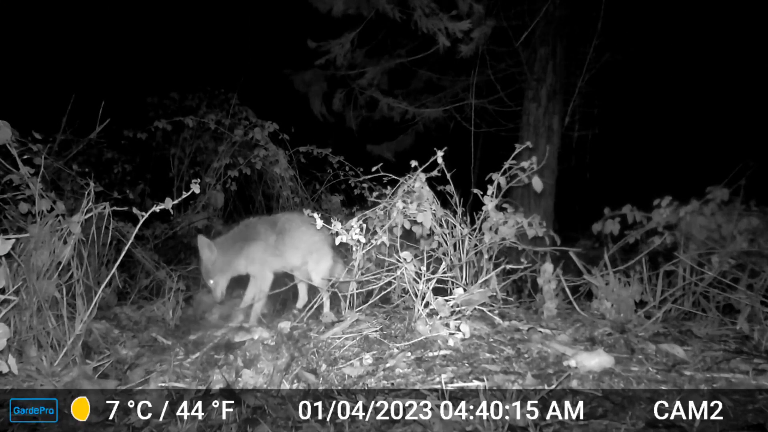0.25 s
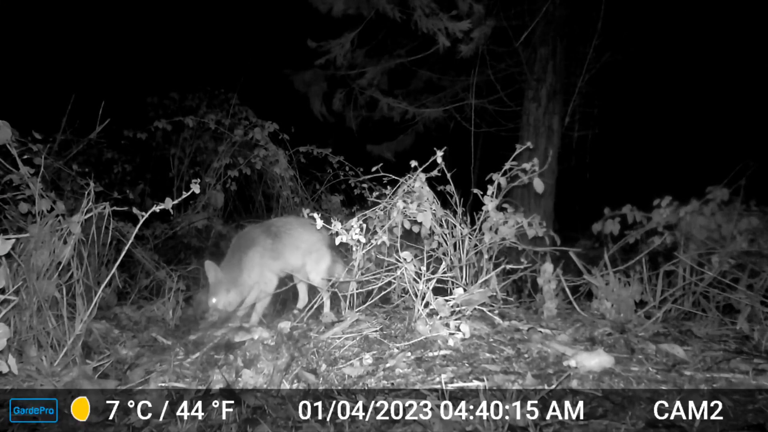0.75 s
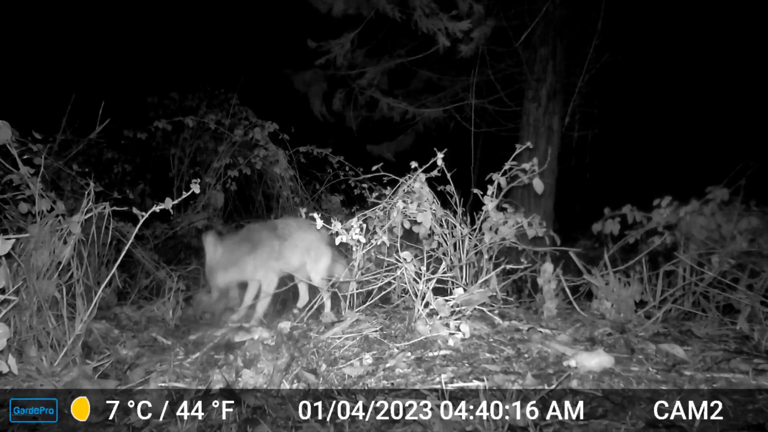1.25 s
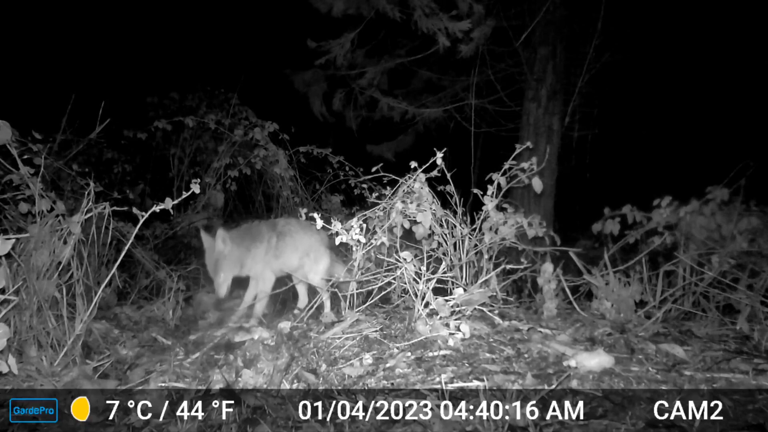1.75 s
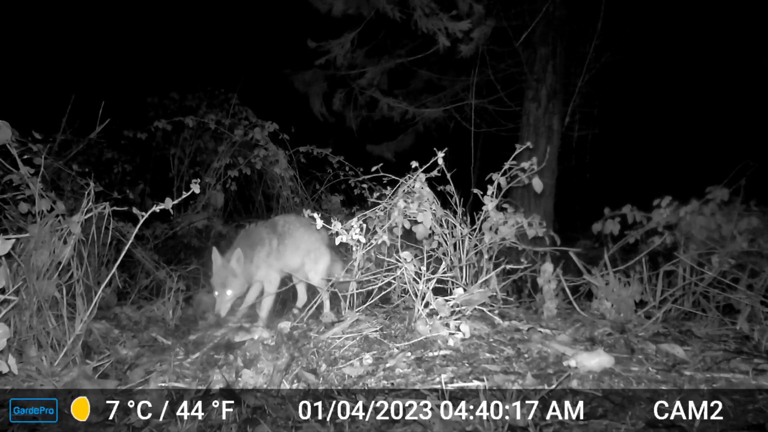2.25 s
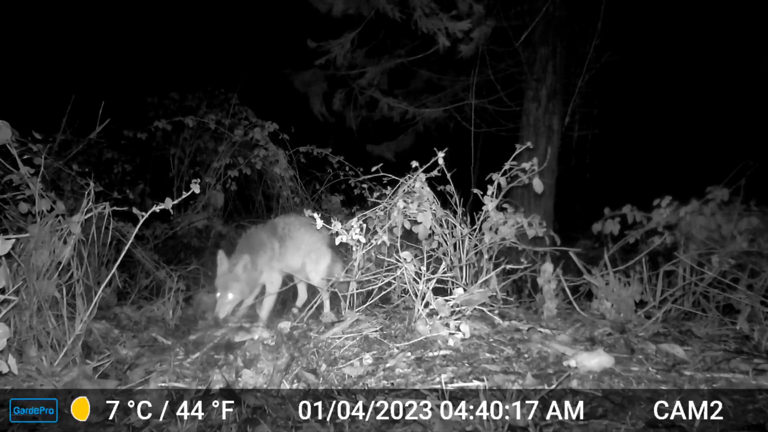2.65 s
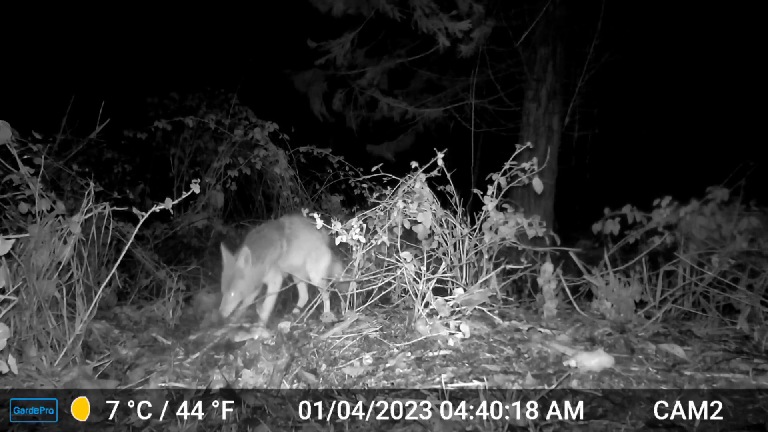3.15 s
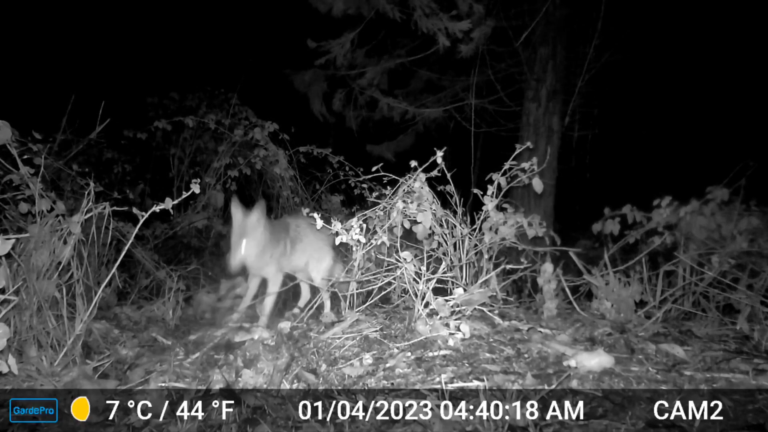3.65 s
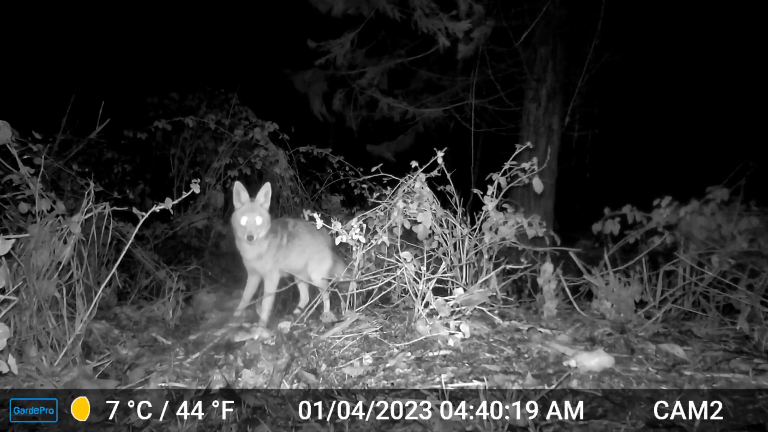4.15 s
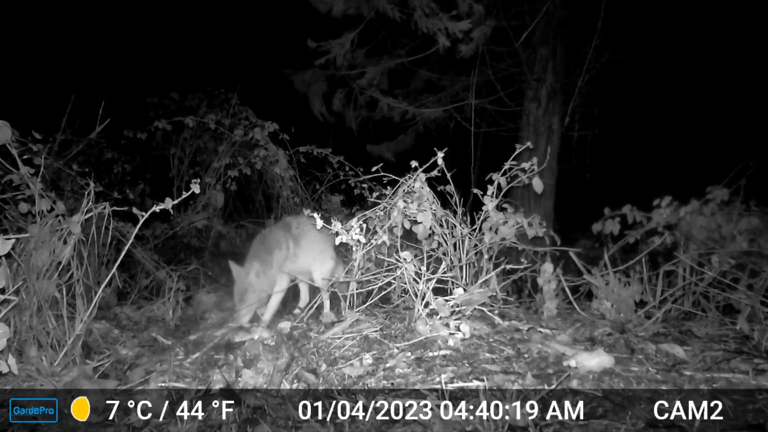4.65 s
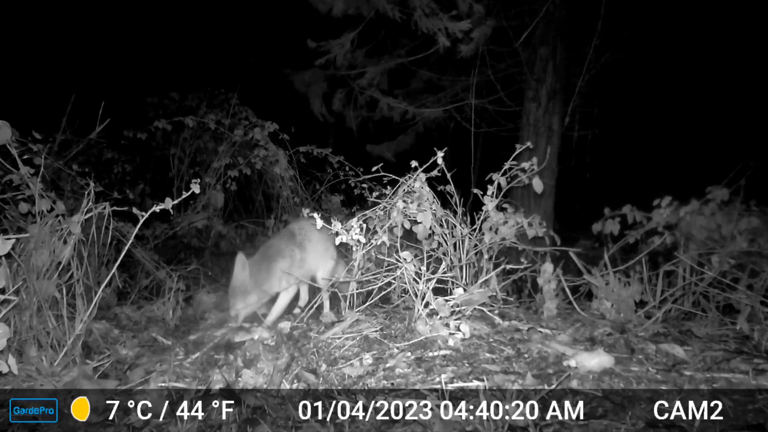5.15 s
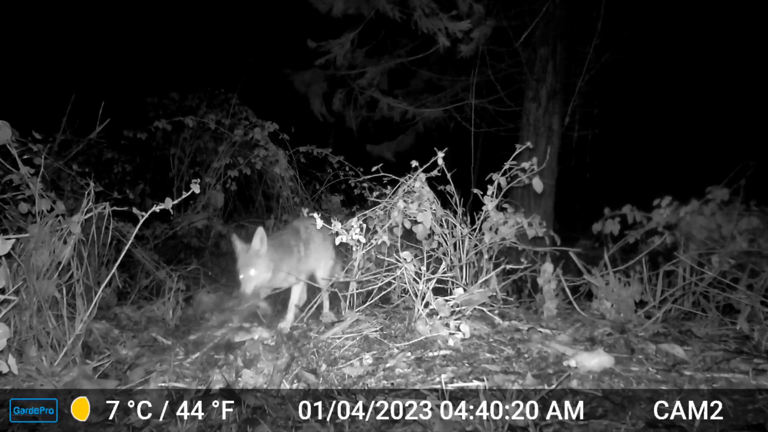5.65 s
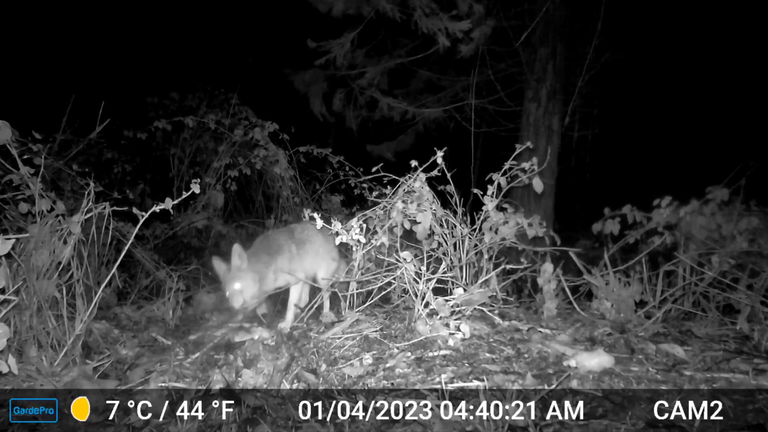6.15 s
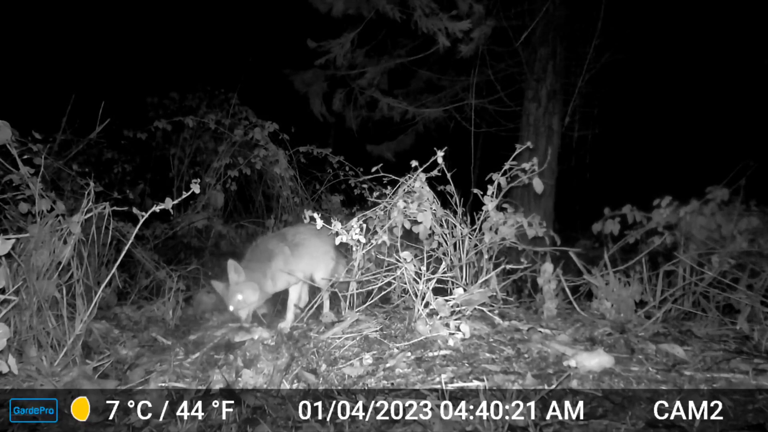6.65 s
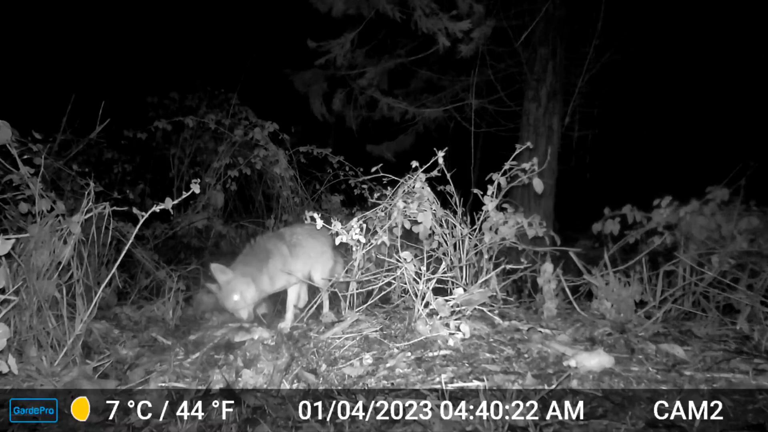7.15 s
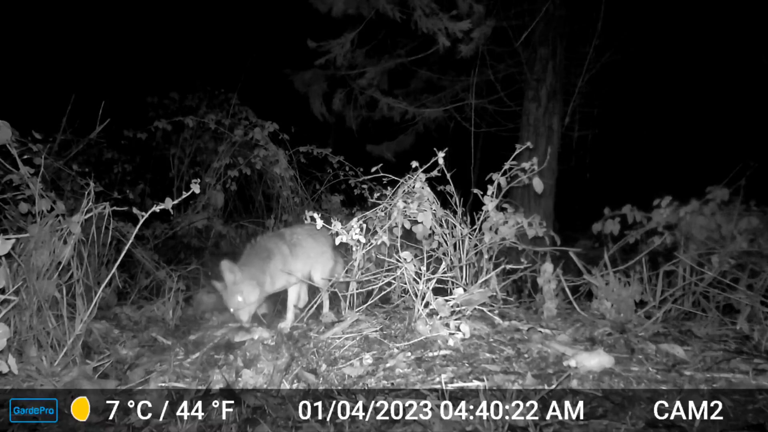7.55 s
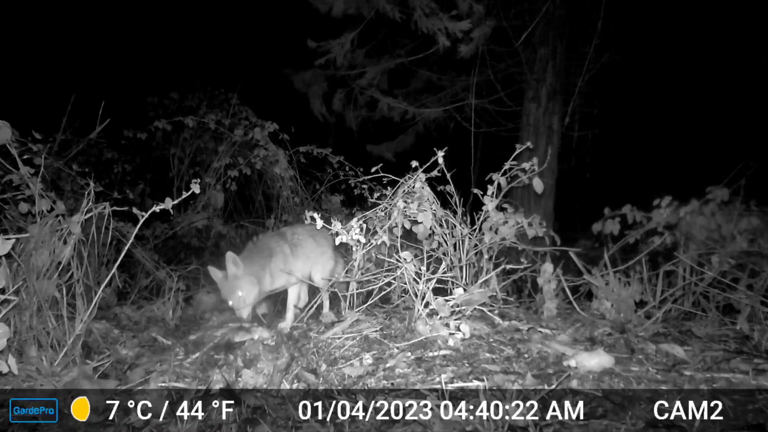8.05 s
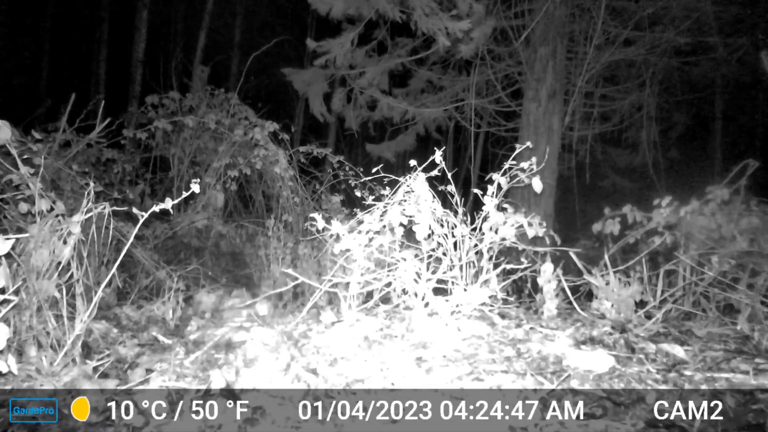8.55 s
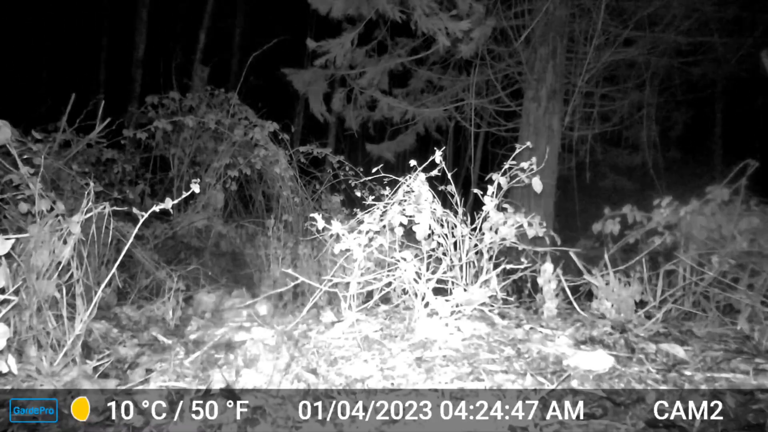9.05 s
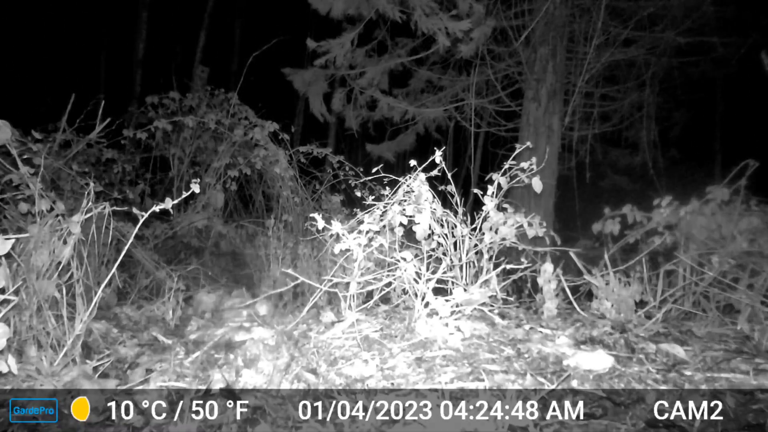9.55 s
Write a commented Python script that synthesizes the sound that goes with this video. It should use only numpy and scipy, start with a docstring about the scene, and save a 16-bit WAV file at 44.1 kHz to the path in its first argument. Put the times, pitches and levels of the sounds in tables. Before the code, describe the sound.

Dull, close outdoor sound without bright treble: a fox gnaws bones on leaf litter, making tiny dry snaps, crunchy rustles and muffled low bumps in uneven bursts. One hollow bone crack stands out early, and a short scraping drag through leaves comes late. Then a sudden cut, a silent gap, and an empty windy place fading up in quick steps, gusts softly knocking the microphone.

```python
"""Night, dry leaves: a fox chews bones a few metres from a small, nearly mono camera microphone.
From the start a low rumble, hiss and crackling leaves flutter under an expander, with teeth clicks as
ringing sprays of noise and dull thuds as low swings. A dull tone wavers at 1.75 s, a bone cracks at 2.9 s
as a noise snap with decaying sines, and at 7.25 s something drags through the leaves. After a silent gap
the gain climbs in steps on an empty, windy scene of shaped noise, where late gusts knock on the microphone."""
import sys
import numpy as np
from scipy import signal
from scipy.fft import rfft, irfft, next_fast_len
from scipy.io import wavfile
from scipy.ndimage import uniform_filter1d

SR = 44100
rng = np.random.default_rng(int(sys.argv[2]) if len(sys.argv) > 2 else 0)


def bounce(signal):
    """Save signal as a 16-bit WAV file at the path given by the first command-line argument."""
    frames = np.transpose(np.atleast_2d(signal))
    limited = np.clip(frames, -1, 1)
    pcm = np.round(limited * 32767).astype(np.int16)
    wavfile.write(sys.argv[1], SR, pcm)


def ratio_of_db(decibels):
    """Turn decibels (scalar or array-like) into linear amplitude factors; 0 dB maps to 1."""
    return 10 ** (np.asarray(decibels, float) / 20)


N = 432621
CUT_S, RESTART_S, FULL_S = 8.229, 8.607, 9.292  # feeding ends, empty scene starts, its gain is full


def in_time(rows):
    """Columns of a curve table, one value per sample."""
    s, *columns = np.transpose(rows)
    return [np.interp(np.arange(N) / SR, s, column) for column in columns]


def rms_one(x):
    """Scale to rms 1."""
    return x / np.sqrt(np.mean(x ** 2) + 1e-20)


def peak_one(x):
    """Scale to peak 1."""
    return x / np.max(np.abs(x))


def colour(x, spectrum):
    """Shape a white signal by (f/Hz, level/dB) points joined over log frequency; rms 1."""
    size = next_fast_len(N)
    hz = np.maximum(np.arange(size // 2 + 1) * SR / size, 1)
    point_hz, point_db = np.transpose(spectrum)
    gain = ratio_of_db(np.interp(np.log(hz), np.log(point_hz), point_db))
    return rms_one(irfft(rfft(x, size) * gain, size)[:N])


def band(x, low_hz, high_hz):
    """Causal band-pass; the upper edge is held to a third of the sample rate."""
    edges = [low_hz, min(high_hz, SR / 3)]
    return signal.sosfilt(signal.butter(2, edges, "band", fs=SR, output="sos"), x)


def add(out, s, sound):
    """Lay a short sound in at time s."""
    i = max(round(s * SR), 0)
    out[i:i + len(sound)] += sound[:N - i]


def lumps(per_s):
    """Slow random wander, rms 1: noise through a double low-pass pole at per_s Hz."""
    r = np.exp(-2 * np.pi * per_s / SR)
    return rms_one(signal.lfilter([1], [1, -2 * r, r * r], rng.standard_normal(N + SR))[SR:])


def grains(per_s, spread_db):
    """Random tiny snaps of uneven size and either sign."""
    sizes = ratio_of_db(spread_db * np.minimum(rng.exponential(1, N), 3.5)) * rng.choice([-1, 1], N)
    return sizes * (rng.random(N) < per_s / SR)


# rumble and leaves while feeding, before the random stir: t/s, rumble level/dB, leaves level/dB
FEEDING = [(0.15, -55, -64.5), (0.55, -59.5, -64.5), (1.05, -57, -67), (1.35, -58.5, -63),
           (1.65, -58.5, -66), (1.9, -52, -65), (2.55, -60, -65), (3.05, -54.5, -63.5), (3.45, -54, -68),
           (3.9, -58, -63), (4.35, -58.5, -72), (4.85, -56, -68), (5.3, -55.5, -62.5), (5.7, -55.5, -59),
           (6.08, -59.5, -62), (6.3, -58, -59), (6.6, -61, -64), (6.87, -54.5, -61.5), (7.05, -60, -62.5),
           (7.25, -57.5, -63), (7.5, -57.5, -64), (7.7, -60, -61), (7.87, -64, -64.5), (8.0, -55, -63.5),
           (8.17, -54.5, -57)]
# spectrum of the rumble: f/Hz, relative level/dB per Hz
RUMBLE_COLOUR = [(12, -50.5), (20, -12.5), (52, -2), (75, 3), (241, -7), (664, -23), (1000, -32),
                 (1300, -43.5), (2200, -120)]


def rumble():
    """Lumpy low noise, stirred more when the leaves are busier; returns it and its stir in dB."""
    rumble_db, leaves_db = in_time(FEEDING)
    stir_db = np.clip(0.41 * (leaves_db + 72.0), 1, 4.5) * lumps(42)
    return ratio_of_db(rumble_db + stir_db) * colour(rng.standard_normal(N), RUMBLE_COLOUR), stir_db


# hiss under the feeding: t/s, level/dB
NEAR_HISS = [(0, -64), (2, -64.5), (2.7, -65), (4.2, -63), (5.6, -63), (6.5, -65), (8.2, -65.5)]
# spectrum of that hiss: f/Hz, relative level/dB per Hz
HISS_COLOUR = [(290, -30), (500, -8.5), (1270, -6.5), (1370, -5.5), (7900, -8), (10300, -42)]


def near_hiss():
    """Steady microphone hiss: shaped noise whose level drifts slightly."""
    return ratio_of_db(in_time(NEAR_HISS)[0]) * colour(rng.standard_normal(N), HISS_COLOUR)


def crackle(per_s=800, spread_db=4.0, cycles=36.0, clumpy_db=5, dry=0.45):
    """Clumped small scrapes: a few ms of noise ring at one of 20 pitches within a dry puff; rms 1."""
    snaps = grains(per_s * ratio_of_db(clumpy_db * lumps(14)), spread_db)
    dealt = rng.integers(0, 20, N)  # which pitch each snap excites
    noise, ringing = rng.standard_normal(N), 0
    for k, hz in enumerate(np.geomspace(500, 7200, 20)):
        r = ratio_of_db(-60 * hz / (cycles * SR))  # falls 60 dB in the given number of cycles
        w = 2 * np.pi * hz / SR
        scrape = noise * uniform_filter1d(np.abs(snaps) * (dealt == k), size=240) + 1e-18
        ring = signal.lfilter([1 - r * r, 0, r * r - 1], [1, -2 * r * np.cos(w), r * r], scrape)
        ringing = ringing + ring / (1 - r) ** 0.81  # lower pitches are stronger
    puff_size = np.sqrt(np.abs(uniform_filter1d(snaps ** 2, size=200)))
    puffs = puff_size * band(rng.standard_normal(N), 320, 6300)
    return rms_one(rms_one(ringing) + dry * rms_one(puffs))


def leaves(low, stir_db, follows=0.54, quiet_db=-56):
    """Crackling leaves that crunch with every low movement, here the short-time power of low."""
    leaves_db = in_time(FEEDING)[1]
    low_power = np.abs(uniform_filter1d(low ** 2, size=500))
    pressed_db = follows * 10 * np.log10(low_power + ratio_of_db(2 * quiet_db))
    return ratio_of_db(leaves_db + 0.5 * stir_db + pressed_db - pressed_db.mean()) * crackle()


# teeth and twigs: t/s, nominal peak level/dB before the expander, ring f/Hz, length/ms, ringing share 0-1
CLICKS = [(0.132, -52, 1110, 4.4, 1), (0.159, -56.5, 1380, 10, 1), (0.198, -51.5, 1400, 8, 0.3),
          (0.2098, -41, 1140, 4.1, 0.72), (0.233, -44, 450, 7.5, 0.8), (0.273, -48, 1250, 5.3, 0.6),
          (0.3866, -33, 2700, 1.3, 0.4), (0.806, -46.5, 1250, 12, 0.97), (0.9774, -47.5, 5640, 3.1, 1),
          (1.073, -51.5, 1114, 39, 0.92), (1.251, -50, 1430, 3, .7), (1.2786, -34.5, 3800, 1.7, 0.66),
          (1.285, -41.5, 6300, 10, 0.56), (1.3154, -42.5, 5600, 2, 0.8), (1.8483, -46.5, 1210, 5.2, 0.64),
          (1.909, -46.5, 916, 2.7, 0.7), (2.044, -50, 1200, 8, .4), (2.25, -48, 1110, 4, 0.8),
          (2.4272, -43.5, 3530, 3, 0.3), (2.463, -28, 1167, 2.2, 0.27), (2.4688, -33.5, 950, 4.5, 0.37),
          (2.702, -32.5, 700, 4.8, 0.08), (2.7118, -32, 1080, 2.1, 0.67), (2.7887, -31, 2080, 1.16, 0.86),
          (2.9098, -31.5, 4500, 1, .2), (2.936, -51, 1290, 8.6, 0.86), (2.9707, -36.5, 1263, 4.1, 0.98),
          (2.9989, -41, 1800, 4.6, 0.8), (3.046, -43, 3500, 5.3, 0.3), (3.174, -47.5, 1410, 3.3, 0.6),
          (3.272, -44, 2070, 4.2, 0.3), (3.416, -45.5, 796, 3.5, 0.8), (3.4398, -34.5, 840, 3.6, 0.65),
          (3.606, -41.5, 4230, 1.1, 0.8), (3.6334, -35, 4360, 2.8, 0.75), (3.6412, -42, 4420, 3.4, 0.5),
          (3.663, -46, 1790, 4, 0.7), (3.688, -39.5, 1080, 1.6, 1), (3.889, -38.5, 750, 0.72, 0.5),
          (3.919, -43.5, 1070, 4.9, 0.5), (4.0356, -46, 986, 4.7, 0.98), (4.299, -45, 3470, 3.6, 0.43),
          (4.7801, -40, 1480, 2.5, 0.64), (4.8477, -42.5, 1167, 1.7, 0.93), (4.965, -46, 1530, 2.3, 0.66),
          (5.068, -45.5, 1440, 3.3, 0.97), (5.087, -42.5, 6900, 5.6, 0.84),
          (5.1163, -46.5, 710, 10.4, 0.58), (5.1608, -37, 3680, 12.3, 0.16), (5.178, -43, 810, 3.2, 0.6),
          (5.264, -38.5, 3390, 1.7, 0.6), (5.2698, -46, 1500, 1.5, 0.1), (5.296, -51, 3400, 7.3, 0.8),
          (5.316, -49, 3250, 4.6, 0.9), (5.389, -43.5, 3900, 2, 0.17), (5.4446, -44, 1226, 2.5, 0.73),
          (5.4528, -40, 3320, 1.1, .7), (5.4564, -36.5, 3740, 1, 0.86), (5.466, -47, 3200, 1.5, 0.3),
          (5.5036, -38.5, 3980, 1.8, 0.95), (5.548, -46, 3890, 2, 0.6), (5.56, -42, 990, 1.5, 0.1),
          (5.5655, -36, 741, 1.9, 0.8), (5.614, -26, 3790, 1.3, 1), (5.6193, -36.5, 4180, 4.9, 0.82),
          (5.679, -42.5, 4060, 2.5, 0.3), (5.689, -43, 3500, 2.5, 0.1), (5.7258, -37.5, 711, 1.6, 0.54),
          (5.8343, -33, 3370, 2, 0.54), (5.845, -39, 730, 1.9, 0.07), (5.882, -36.5, 3970, 3.5, 0.3),
          (5.93, -48.5, 840, 4.5, 0.7), (5.9476, -38, 2100, 4.8, 0.2), (5.9555, -45, 2250, 19, 0.55),
          (5.977, -45, 2320, 2.3, 0.7), (6.0053, -42.5, 1400, 4.1, 0.84), (6.107, -51.5, 1530, 9.6, 0.43),
          (6.1576, -43.5, 5630, 7.6, 0.75), (6.178, -37.5, 7060, 3.2, 0.89), (6.245, -46, 860, 12.5, 0.8),
          (6.2698, -32.5, 1240, 1.1, 0.7), (6.3024, -49, 2320, 7.3, 0.74), (6.3553, -48, 1730, 10, 0.64),
          (6.3784, -39, 730, 3.4, 0.64), (6.473, -45, 763, 4, 0.6), (6.485, -31.5, 5400, 4, 0.98),
          (6.78, -41, 3600, 2.9, 0.8), (6.791, -47, 2200, 8.5, .3), (6.834, -42, 6860, 2.6, 0.97),
          (6.842, -52, 6800, 12, 0.7), (6.864, -41.5, 4931, 4.7, 0.5), (6.881, -45.5, 4800, 2.1, .3),
          (6.904, -49, 2690, 11, 0.35), (7.0913, -36, 3990, 3.6, 0.85), (7.209, -43.5, 3170, 2.5, 0.7),
          (7.4738, -39.5, 6520, 3, 0.92), (7.555, -53, 1370, 11, 0.93), (7.696, -42.5, 1120, 2.7, 0.5),
          (7.729, -46, 1220, 5.6, 0.54), (7.8148, -40.5, 6750, 0.92, 0.5), (7.937, -46, 673, 7.6, 0.4),
          (7.955, -52, 2000, 3.2, 0), (8.002, -51, 1190, 12, 0.5), (8.049, -42.5, 2670, 5.7, 0.1),
          (8.095, -44.5, 5100, 4.2, 0.9), (8.1016, -42, 7000, 2.8, 0.4), (8.11, -47, 3500, 6.7, .4),
          (8.137, -46, 4640, 4, 0.6), (8.161, -48, 2500, 5, 0.1), (8.1765, -45.5, 2540, 3.1, 0.3),
          (8.184, -49, 3450, 3, .6), (8.209, -53, 1230, 7.9, 0.9), (8.222, -42, 1130, 8.3, 0.36)]


def clicks(width=1.08, fall=1.12, tail_db=-22, tail_s=0.016, gritty_db=4.5, crest_db=3.0, chip_s=0.0012):
    """Sprays of splinters: part rings at one pitch, part is broad and chip-coloured; a faint tail settles."""
    t, out = np.arange(-600, 1800) / SR, np.zeros(N)
    shape_2d = (len(CLICKS), len(t))
    grit = rng.standard_normal(shape_2d) * ratio_of_db(gritty_db * rng.standard_normal(shape_2d))
    chips = rng.standard_normal((len(CLICKS), 200)) * np.exp(-np.arange(200) / (chip_s * SR))
    tail = ratio_of_db(tail_db) * np.exp(-np.abs(t) / tail_s) * (t > 0)
    for (s, level_db, hz, length_ms, share), spray, chip in zip(CLICKS, grit, chips):
        half = length_ms / 2000  # seconds
        shape = np.exp(-(t / np.where(t < 0, half, fall * half)) ** 2) + tail
        ring = band(spray, hz / width, hz * width) * shape
        broad = band(signal.lfilter(chip, [1], spray[::-1]), 180, 5000) * shape
        core = np.abs(t) < half
        ring_part = np.sqrt(share) * ring / np.std(ring[core])
        broad_part = np.sqrt(1 - share) * broad / np.std(broad[core])
        add(out, s + t[0], ratio_of_db(level_db - crest_db) * (ring_part + broad_part))
    return out


def low_swings(events, scuffed, cycles=0.4, after_hz=75, after_db=-8, after_s=0.011,
               scuff_db=-20, scuff_s=0.0054):
    """A dip then a push, a slow low swing after it and, if scuffed, a puff of leaf noise on top."""
    t, out = np.arange(-900, 2600) / SR, np.zeros(N)
    puffs = rng.standard_normal((len(events), len(t))) * np.exp(-(t / scuff_s) ** 2)
    after = ratio_of_db(after_db) * np.sin(2 * np.pi * after_hz * t) * np.exp(-np.abs(t) / after_s) * (t > 0)
    for (s, peak_db, hz), puff in zip(events, puffs):
        push = np.sin(2 * np.pi * hz * t) * np.exp(-(t * hz / cycles) ** 2)
        scuff = ratio_of_db(scuff_db) * band(puff, 250, 3500) * scuffed
        add(out, s + t[0], ratio_of_db(peak_db) * (peak_one(push) + after + scuff))
    return out


# dull thuds of jaw and paws: t/s, peak level/dB of the push before the expander, swing f/Hz
THUDS = [(0.1341, -34.5, 129.4), (0.2023, -30.5, 144), (0.2145, -34, 70), (0.2305, -32.5, 131),
         (0.7843, -31.5, 203), (1.1771, -40, 265), (1.5815, -42, 143.5), (1.8739, -40, 272),
         (1.9093, -36.5, 226), (1.9362, -40.5, 310), (2.1622, -37.5, 240), (2.3177, -41, 151),
         (2.428, -38, 145), (2.4683, -30, 380), (2.6873, -37, 97.1), (2.7058, -35, 280),
         (2.7897, -36, 317.7), (2.903, -33.5, 150), (2.9723, -37.5, 118), (2.999, -35, 153.6),
         (3.0465, -33, 330), (3.2726, -31.5, 135), (3.4165, -39, 350), (3.4325, -35, 361),
         (3.4504, -34.5, 194), (3.6623, -32, 102), (3.7833, -34.5, 175), (3.888, -38, 280),
         (3.9621, -33.5, 120.4), (4.0373, -34.5, 237), (4.1207, -33, 213), (4.2992, -35.5, 179),
         (4.7806, -34.5, 150), (5.1158, -35.5, 210), (5.1779, -34, 193), (5.2652, -39, 288),
         (5.315, -39.5, 171), (5.4452, -41.5, 311), (5.6794, -41.5, 197), (5.6904, -39, 180),
         (5.7399, -39.5, 234), (5.8459, -38.5, 138), (5.9588, -30.5, 316), (5.9789, -34, 235),
         (6.0061, -42.5, 258), (6.2466, -34, 185), (6.2702, -40.5, 104), (6.297, -38.5, 250),
         (6.3061, -34.5, 312), (6.3551, -40, 140), (6.3732, -34, 116), (6.4745, -36, 198),
         (6.6698, -42, 193), (6.913, -32, 103.7), (6.9909, -40, 290), (7.4741, -33.5, 130.5),
         (7.697, -40.5, 173), (7.7253, -36.5, 153), (7.9373, -37, 205), (8.0497, -35, 230),
         (8.087, -41, 130), (8.2241, -36.5, 170)]


def thuds(soft_count=40, over_rumble_db=9.5, spread_db=7, low_hz=70, high_hz=330):
    """Low swings with leaf scuffs: the listed thuds and random small ones that follow the rumble level."""
    when, size, pitch = rng.random((soft_count, 3)).T
    soft_s = when * CUT_S
    curve_s, rumble_db, _ = np.transpose(FEEDING)
    soft_db = np.interp(soft_s, curve_s, rumble_db) + over_rumble_db + spread_db * size
    soft = np.transpose([soft_s, soft_db, low_hz * (high_hz / low_hz) ** pitch])
    return low_swings([*THUDS, *soft], scuffed=True)


def drone(start_s=1.75, end_s=2.55, hz=250, level_db=-61):
    """A dull wavering tone for a while: narrow-band noise with a random level, faded over 0.1 s."""
    t = np.arange(N) / SR
    on = np.clip(np.minimum(t - start_s, end_s - t) * 10, 0, 1)
    tone = rms_one(band(rng.standard_normal(N), hz / 1.12, hz * 1.14))
    return ratio_of_db(level_db + 3.4 * lumps(20)) * on * tone


# ringing modes of the hollow bone: f/Hz, relative level/dB, 60 dB decay time/s
BONE = [(1270, -3, 0.021), (700, -11, 0.008), (2250, -17, 0.008), (3050, -16, 0.01)]


def crack(at_s=2.8932, ring_db=-6.5, snap_db=-3.5, split_s=0.0015, settle_s=0.011, settle_db=-23):
    """The shaft splits in a bright snap that sets the hollow bone ringing."""
    t, out = np.arange(2600) / SR, np.zeros(N)
    settling = ratio_of_db(settle_db + 4 * lumps(150)[:len(t)]) * np.exp(-t / settle_s)
    snap = rng.standard_normal(len(t)) * (np.exp(-t / split_s) + settling)
    swell = 1 - np.exp(-(t / 0.0017) ** 2)  # the ring builds over about two cycles
    ring = sum(ratio_of_db(db - 60 * t / t60) * np.sin(2 * np.pi * hz * t) for hz, db, t60 in BONE) * swell
    add(out, at_s, ratio_of_db(ring_db) * peak_one(ring) + ratio_of_db(snap_db) * peak_one(band(snap, 1700, 12000)))
    return out


# spectrum of the drag: f/Hz, relative level/dB per Hz
DRAG_COLOUR = [(180, -46), (300, -16.5), (802, -21), (973, -22.5), (2230, -16.5), (2490, -8), (4160, -4.5),
               (5640, -3.5), (8200, -24), (10700, -63)]


def drag(at_s=7.251, hold_s=0.024, level_db=-34, rise_db_per_s=2102, fall_db_per_s=1500):
    """One long drag through the leaves: dense shaped grains that rise, hold and fall away."""
    t = np.arange(N) / SR - at_s
    slope_db = np.minimum(rise_db_per_s * t, fall_db_per_s * (hold_s - t))
    return ratio_of_db(level_db + np.minimum(0, slope_db)) * colour(grains(6000, 3.6), DRAG_COLOUR)


def expander(x, knee_db=-58, slope=3.2, window_s=0.00081, floor_db=-22):
    """Whatever falls under the knee is pushed further down, within milliseconds."""
    size = round(window_s * SR)
    level_db = 10 * np.log10(uniform_filter1d(x ** 2, size) + 1e-12)
    gain_db = np.clip(slope * (level_db - knee_db), floor_db, 0)
    return x * ratio_of_db(uniform_filter1d(gain_db, size // 4))


# wind of the empty scene at full gain: t/s, level/dB
WIND = [(9.3, -51.5), (9.56, -52.5), (9.81, -51.5)]
# spectrum of the wind: f/Hz, relative level/dB per Hz
WIND_COLOUR = [(12, -41), (20, -21), (84, -7), (117, -9), (206, -23.5), (1200, -38), (1560, -37.5),
               (2640, -120)]


def empty_scene(hiss_db=-65.5, step_s=0.064, step_db=7, lowest_db=-45):
    """Wind on the microphone and steady hiss; the gain waits low, then climbs in even steps."""
    t = np.arange(N) / SR
    wind = ratio_of_db(in_time(WIND)[0]) * colour(rng.standard_normal(N), WIND_COLOUR)
    hiss = ratio_of_db(hiss_db) * rms_one(band(rng.standard_normal(N), 330, 6600))
    gain_db = np.clip(step_db * np.floor((t - FULL_S) / step_s), lowest_db, 0)
    return (wind + hiss) * ratio_of_db(gain_db) * (t > RESTART_S)


# gusts that knock on the microphone: start t/s, length/s, mean peak level/dB of the pushes
GUSTS = [(9.498, .1, -43), (9.753, .01, -41)]


def wind_knocks(gap_s=0.011, hz=95.16):
    """Each gust is a run of low swings, uneven in time, level and pitch."""
    knocks = []
    for start, length, db in GUSTS:
        for s in np.arange(start, start + length, gap_s):
            knock_s = s + gap_s * rng.uniform(-0.32, 0.27)
            knocks.append((knock_s, db + rng.normal(0, 1.5), hz * rng.uniform(0.8, 0.86)))
    return low_swings(knocks, scuffed=False)


def scene():
    """Feeding until the cut, silence, then the empty scene; the same in both channels."""
    t = np.arange(N) / SR
    low = thuds() + wind_knocks()
    rumbling, stir_db = rumble()
    background = rumbling + near_hiss() + leaves(low + rumbling, stir_db) + drone() + drag()
    feeding = expander(background + clicks() + low + crack())
    empty = low * (t > RESTART_S) + empty_scene()
    return np.tile(np.where(t < CUT_S, feeding, empty), (2, 1))


def top_cut(x):
    """Nothing passes above the cut-off."""
    return signal.sosfilt(signal.butter(12, 8900, fs=SR, output="sos"), x)


def record(dry):
    """A steep low-pass dulls the top; the channels differ by a faint hiss that follows the level."""
    level = np.sqrt(np.abs(uniform_filter1d(band(dry[0], 300, 8000) ** 2, size=400)))
    apart = ratio_of_db(-27) * level * band(rng.standard_normal(N), 150, 9000)
    low_pass = signal.cheby2(16, 55, 8620, fs=SR, output="sos")  # 55 dB down from 8620 Hz
    mix = signal.sosfilt(low_pass, dry + apart * [[1], [-1]])
    return top_cut(mix)


dry = scene()
out = record(dry)
bounce(out)
```